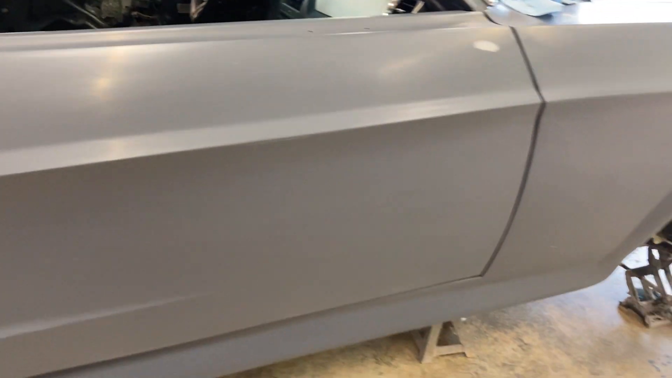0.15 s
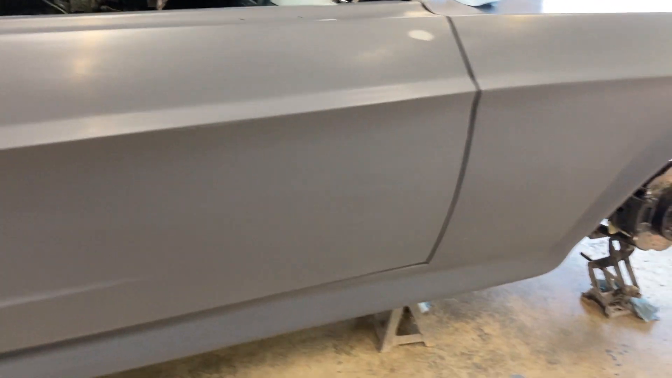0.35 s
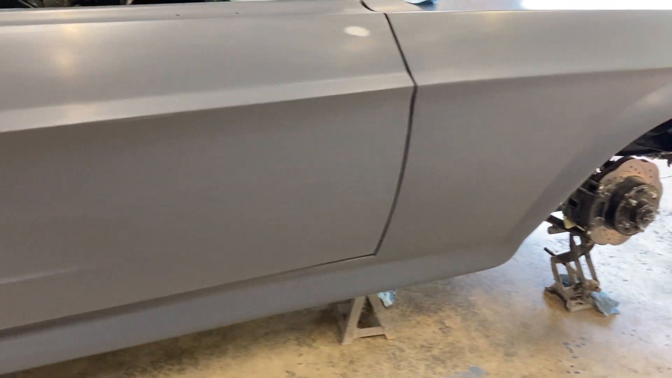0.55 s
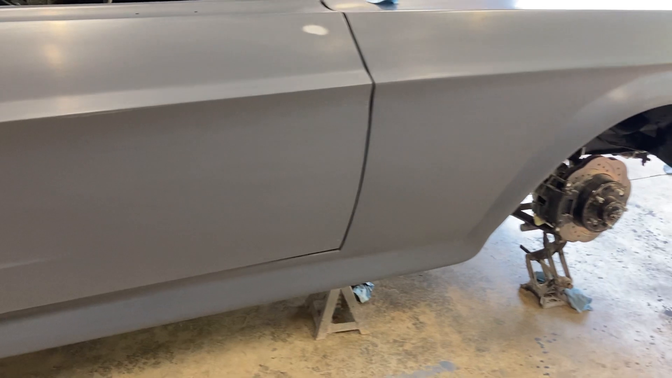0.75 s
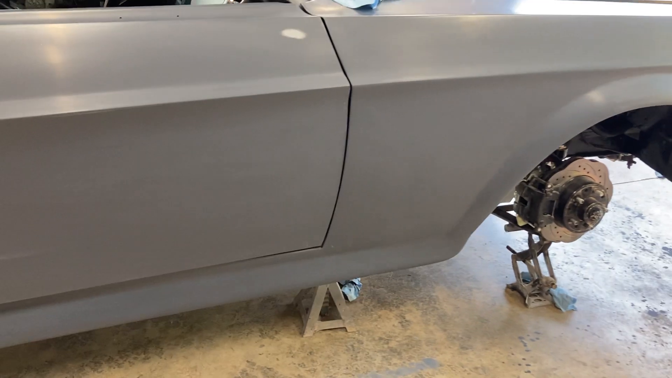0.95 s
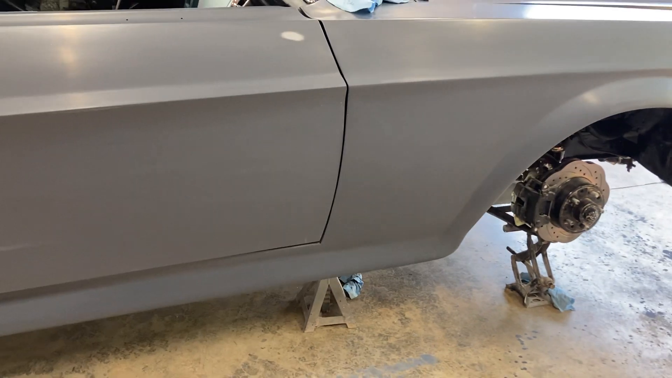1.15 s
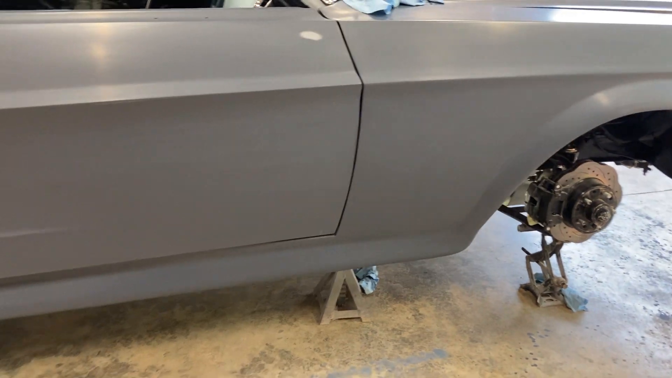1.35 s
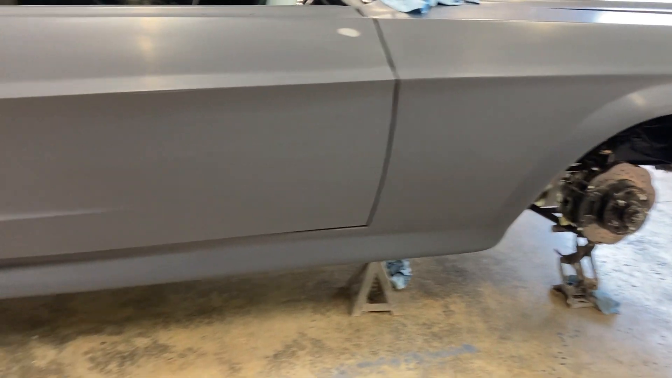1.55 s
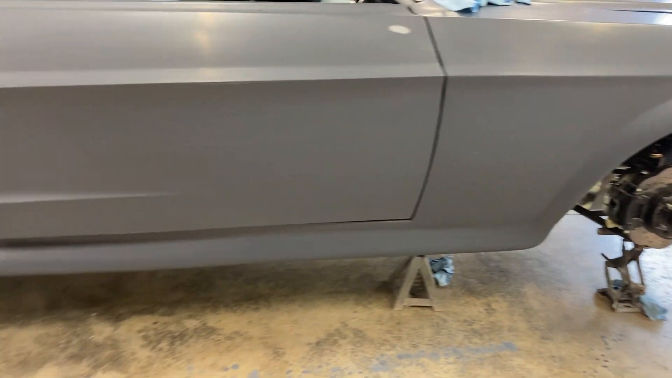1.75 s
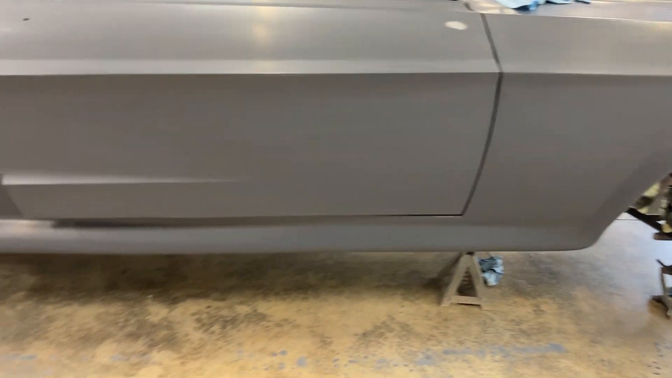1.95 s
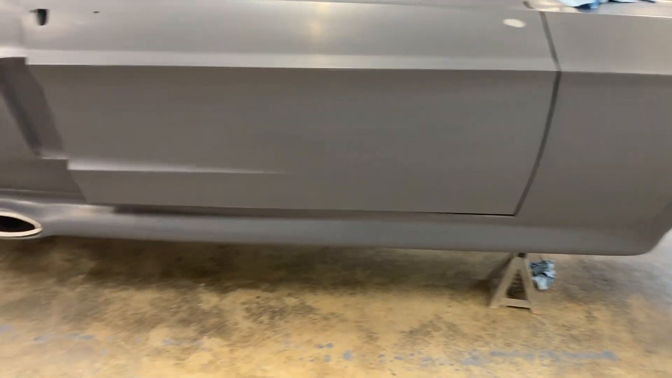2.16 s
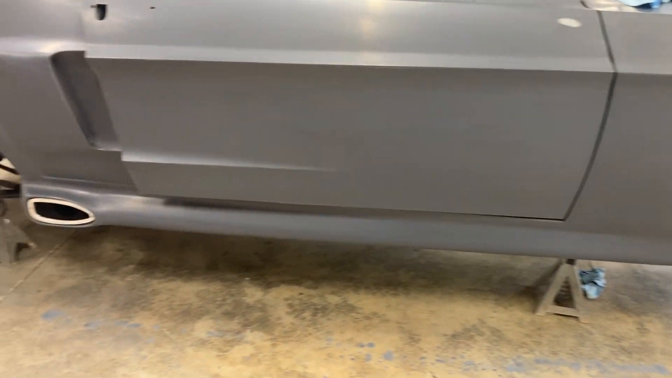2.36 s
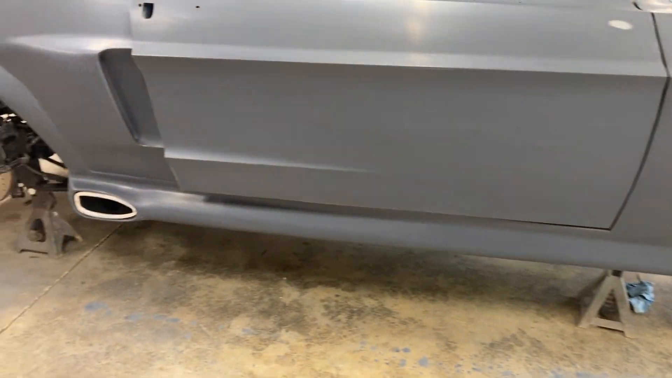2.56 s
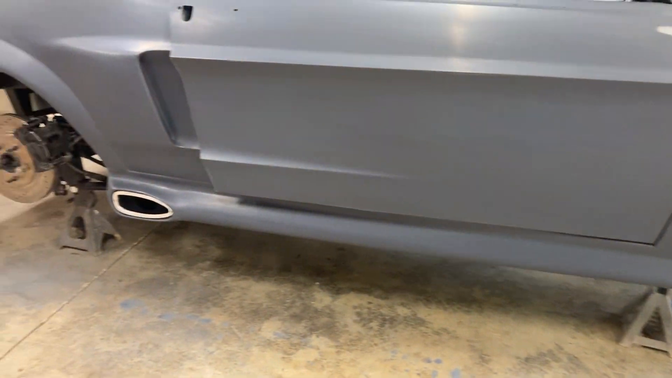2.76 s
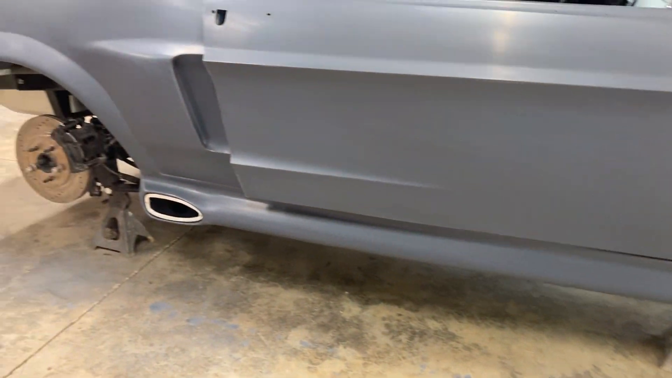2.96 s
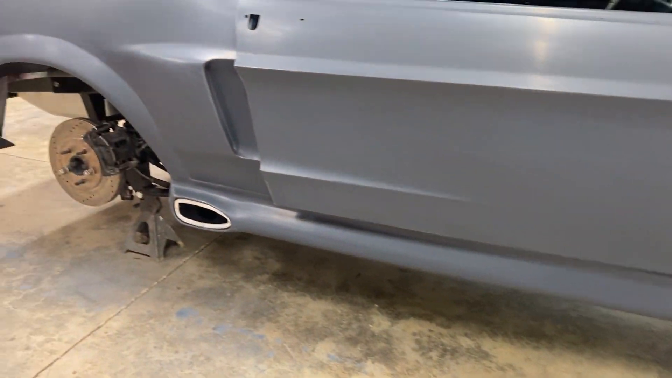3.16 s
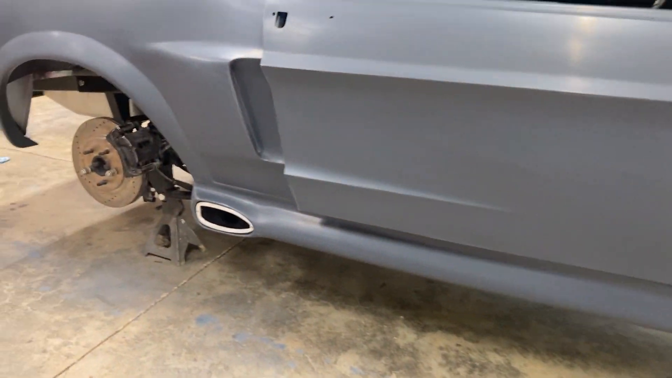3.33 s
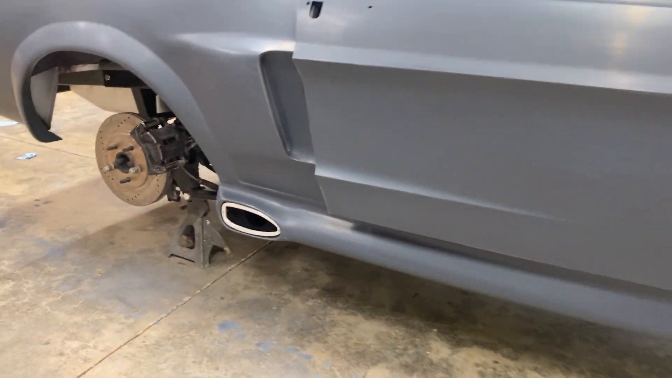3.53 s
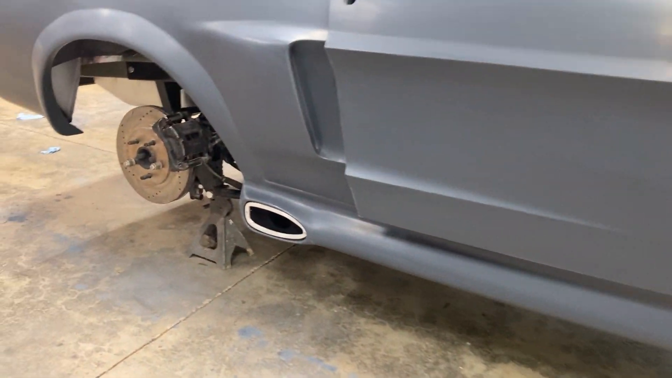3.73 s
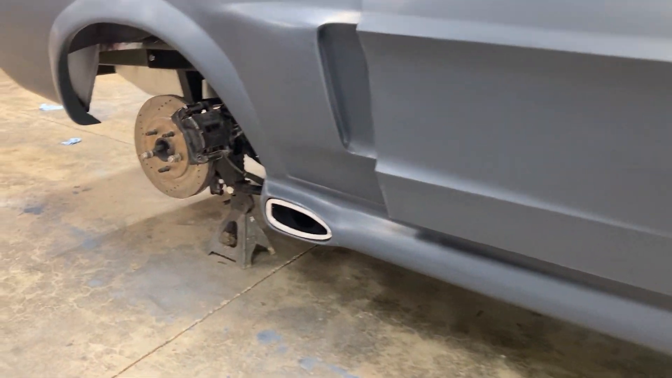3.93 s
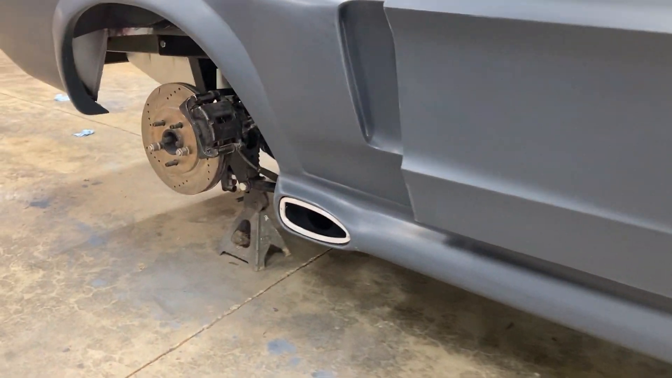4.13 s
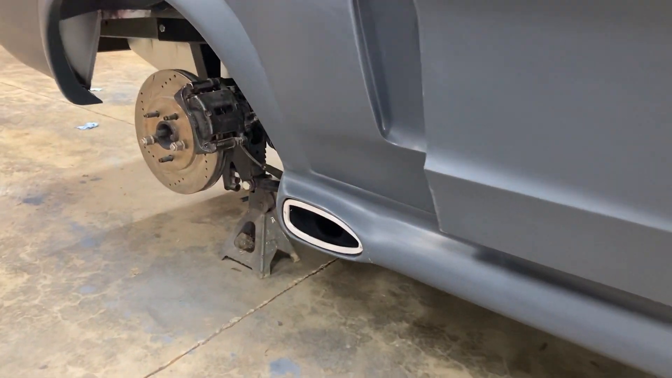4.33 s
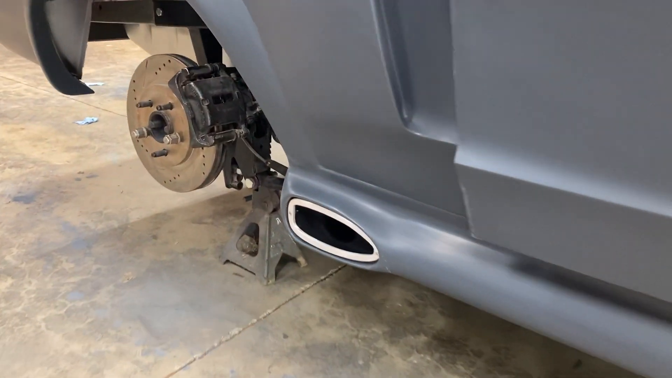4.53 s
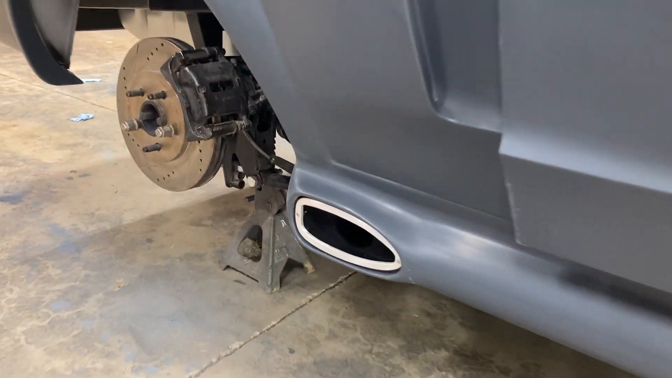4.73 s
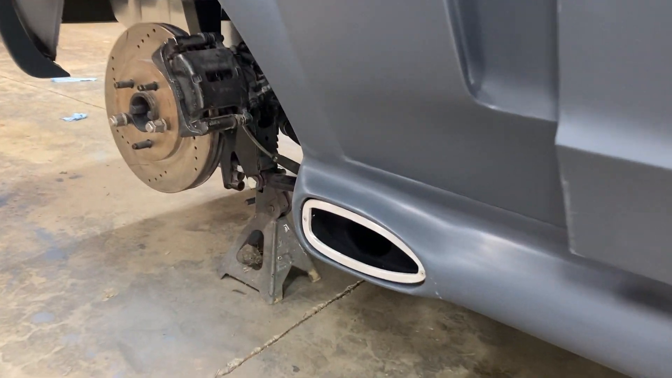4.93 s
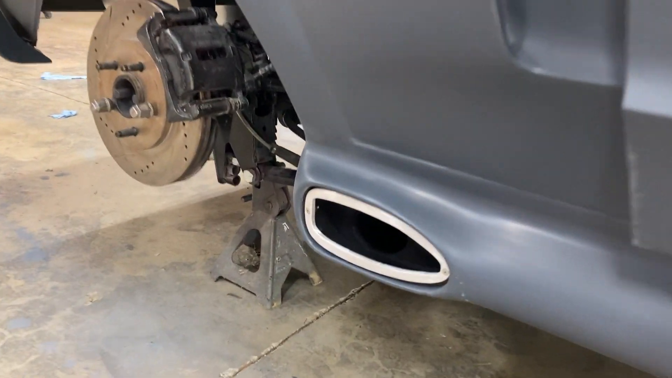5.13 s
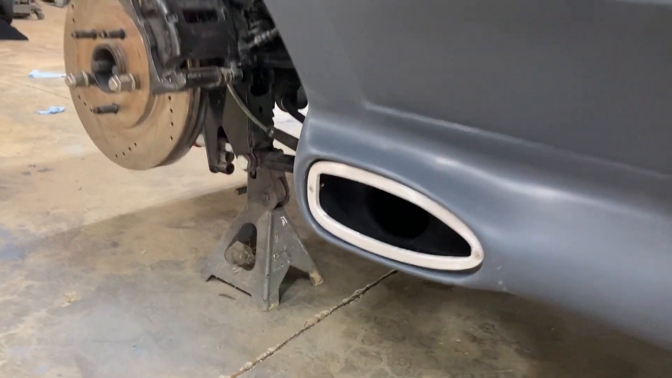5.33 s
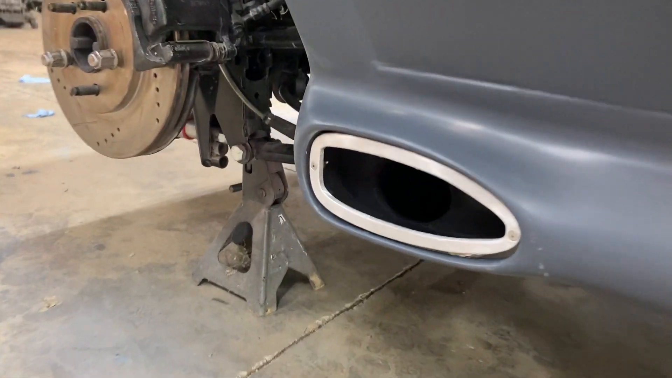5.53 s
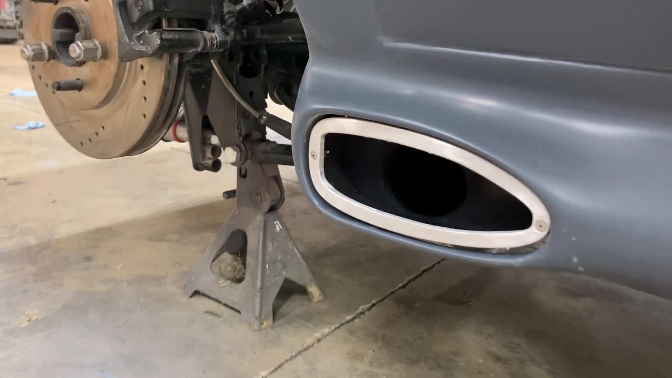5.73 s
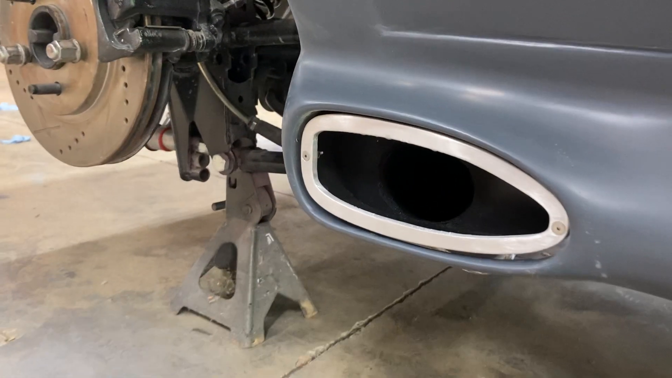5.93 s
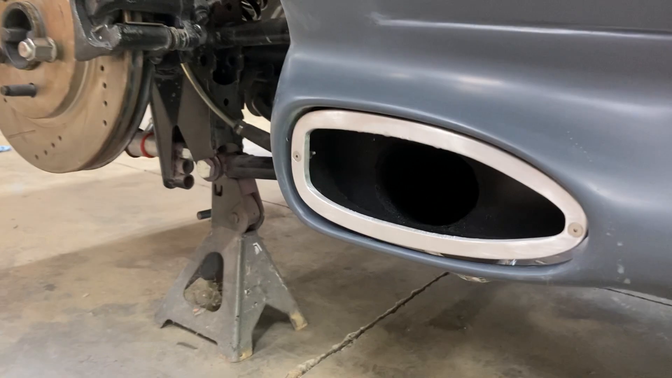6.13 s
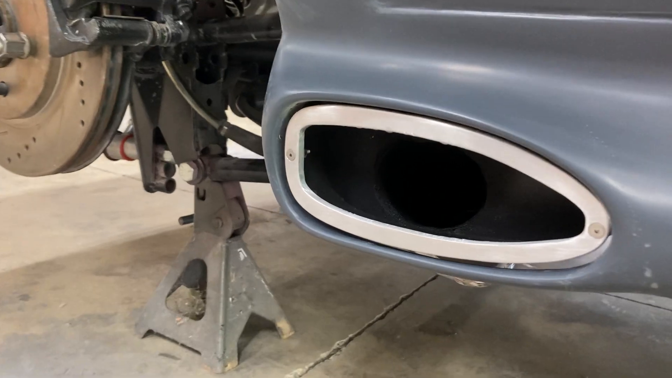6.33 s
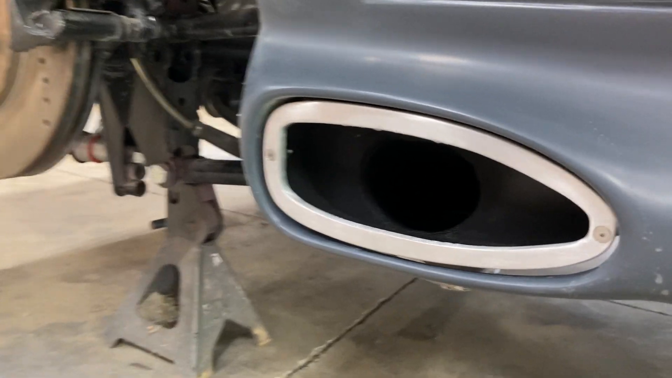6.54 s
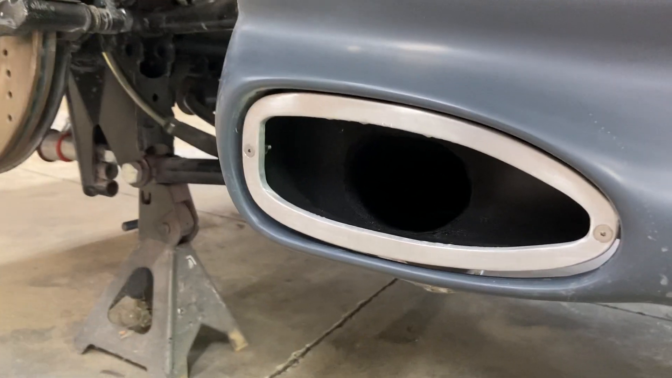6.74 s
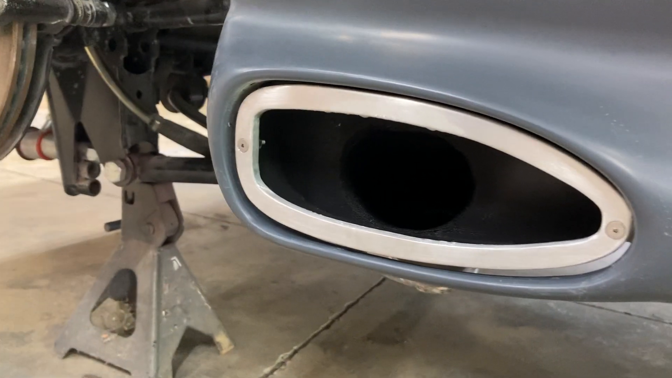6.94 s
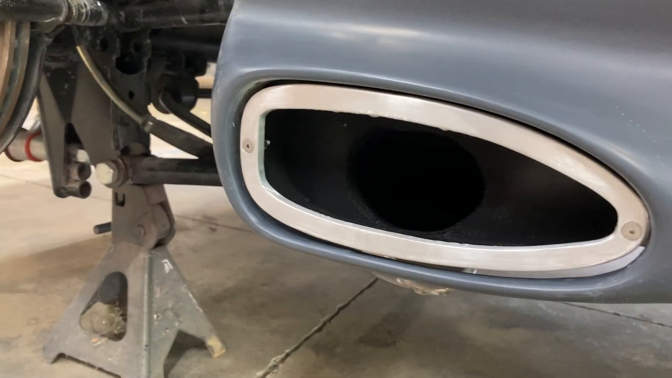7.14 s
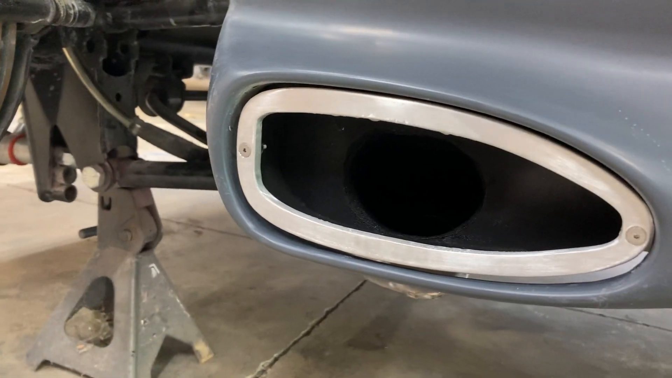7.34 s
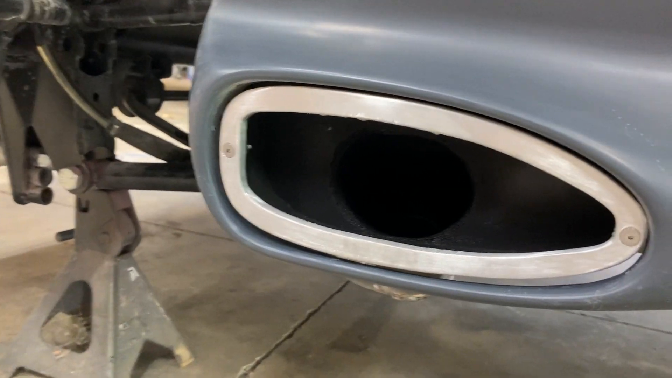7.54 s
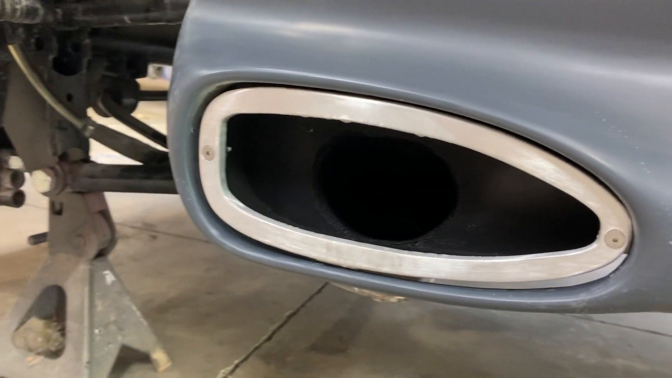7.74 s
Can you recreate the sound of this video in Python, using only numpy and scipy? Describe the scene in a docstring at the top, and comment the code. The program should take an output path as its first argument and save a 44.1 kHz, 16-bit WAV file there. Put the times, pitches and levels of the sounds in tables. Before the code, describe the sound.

A V8 idles with a lumpy low burble in a workshop, belt whine and valve clatter fading behind as the side exhaust grows louder and closer.

```python
"""A V8 idles in a workshop while a phone is walked from the front wing past the door to the side exhaust tip.
At the wing: belt whines, clatter, whirr and hiss of the bay, with two valve ticks a cycle in the hiss.
By the door the bay has moved to the right; towards the tip the exhaust grows louder.
Exhaust: uneven blows and echoes, nearly alike every cycle, ring pipe modes over firing tones and gas noise.
Bay: shaped noise, scattered tappet impulses and tones, tied to the same crank."""
import sys
import numpy as np
from scipy import signal
from scipy.fft import rfft, irfft, next_fast_len
from scipy.io import wavfile
from scipy.ndimage import uniform_filter1d, minimum_filter1d, map_coordinates

SR = 44100
rng = np.random.default_rng(int(sys.argv[2]) if len(sys.argv) > 2 else 0)


def waveform_to_disk(signal):
    """Save audio, clipped to [-1, 1], as 16-bit WAV at the path in sys.argv[1]."""
    frames = np.transpose(np.atleast_2d(signal))
    scaled = np.clip(frames, -1, 1) * 32767
    samples = np.round(scaled).astype(np.int16)
    wavfile.write(sys.argv[1], SR, samples)


N = 347508


def amp(db):
    """dB to gain."""
    return 10 ** (np.asarray(db) / 20)


def unit(x):
    """x at rms 1."""
    return x / np.sqrt(np.mean(x ** 2) + 1e-20)


def along(points, hz):
    """(f/Hz, value) points read on a log frequency axis."""
    f, value = np.transpose(points)
    return np.interp(np.log(hz + 1), np.log(f + 1), value)


def curves(rows):
    """One value per sample for each column after t/s."""
    t_s, *columns = np.transpose(rows)
    return [np.interp(np.arange(N) / SR, t_s, column) for column in columns]


def wobble(knots_per_s):
    """Smooth random curve through normal knots."""
    knots = rng.standard_normal(int(N * knots_per_s / SR) + 4)
    return map_coordinates(knots, [np.arange(N) * knots_per_s / SR])


def filtered(x, response):
    """x through a complex response of frequency."""
    m = next_fast_len(N + SR // 2)
    return irfft(rfft(x, m) * response(np.fft.rfftfreq(m, 1 / SR)), m)[..., :N]


def resonance(f, centre_hz, width_hz):
    """Causal band resonance of peak gain 1."""
    return 1j * f * width_hz / (centre_hz ** 2 - f * f + 1j * f * width_hz)


def ringing(modes, f):
    """Causal sum of (f/Hz, width/Hz, level/dB) resonances, each passed twice for dark valleys."""
    return sum(amp(db) * resonance(f, hz, width_hz) ** 2 for hz, width_hz, db in modes)


def spectrum(points):
    """Noise colour: gain response through (f/Hz, density/dB) points."""
    return lambda f: amp(along(points, f))


def alike(hz):
    """Left-right likeness by frequency: the channels differ more in the treble."""
    # f/Hz, correlation
    likeness = [(60, 0.83), (300, 0.98), (640, 0.78), (1400, 0.4), (3500, 0.28), (6000, 0.16)]
    return along(likeness, hz)


def noise(response, likeness, gate=1):
    """Stereo noise of rms 1, gated before its filter; mid and side shares set likeness(hz)."""
    turn = lambda hz: np.arccos(np.clip(likeness(hz), -1, 1)) / 2
    split = lambda hz: response(hz) * [np.cos(turn(hz)), np.sin(turn(hz))]
    mid, side = filtered(gate * rng.standard_normal((2, N)), split)
    return unit(np.array([mid + side, mid - side]))


def place():
    """Position along the car: 0 front wing, 1 door, 2 exhaust tip."""
    # t/s, place
    walk = [(0, 0), (2.2, .1), (3.2, 1.0), (4.6, 1.0), (5.7, 2.0), (7.88, 2.0)]
    return curves(walk)[0]


def by_place(values):
    """A (wing, door, tip) triple read along the walk."""
    return np.interp(place(), range(3), values)


def in_cycle(cycles, bumps):
    """dB lift of (centre/cycle, length/cycle, lift/dB) bumps that return every cycle."""
    offset = lambda at: (cycles - at + .5) % 1 - .5
    return sum(db * np.exp(-(offset(at) / span) ** 2) for at, span, db in bumps)


def exhaust(cycles):
    """Blows ring the pipe over firing tones; gas rush feeds the higher modes."""
    # t/s, bark level/dB, firing tone level/dB, octave level/dB, 2nd mode level/dB, 3rd mode level/dB
    # (all before trims)
    levels = [(0, -21.5, -32.5, -30, -39, -35.5), (.7, -23, -33, -29.5, -33, -31),
              (1.3, -21, -34, -31.5, -36, -31), (2.0, -20, -34.5, -34, -35, -30.5),
              (2.7, -22.5, -32.5, -35, -35, -38), (3.3, -22, -32, -38.5, -33, -34.5),
              (4.0, -21.5, -31, -33, -30.5, -36), (4.7, -19, -29.5, -32, -31.5, -32.5),
              (5.3, -19, -25.5, -28, -32, -27), (5.8, -16, -23, -31, -29, -30.5),
              (6.3, -16.5, -21.5, -29, -26, -31.5), (6.7, -13.5, -23.5, -20.5, -25, -25.5),
              (7.25, -14, -21, -22.5, -23.5, -27.5), (7.88, -13.5, -23, -17.5, -21.5, -24)]
    bark_db, firing_db, octave_db, second_db, third_db = curves(levels)
    trains = blow_trains(cycles)
    barking = bark(trains) + drone(cycles)
    mono = amp(bark_db - 1.2 + .4 * wobble(3)) * barking
    mono = mono + np.sqrt(2) * firing_tones(cycles, firing_db, octave_db) + buffet(firing_db)
    quadrature = filtered(mono, lambda f: .06j * np.ones_like(f))  # the left port leads slightly
    low = mono * amp([[.9], [-.9]]) + quadrature * [[1], [-1]]
    low = low + amp(second_db) * second_mode(cycles, trains)
    return low + overtones(cycles, trains, third_db) + rumble(cycles, bark_db)


def blow_trains(cycles):
    """One impulse train per spot on the walk: blows as both pipes and the walls deliver them."""
    # one list per spot: moment/cycle, size/dB before spread
    patterns = [
        [(0.079, -12.2), (0.109, -7.6), (0.139, -9.2), (0.306, -6.0), (0.479, 0.0), (0.564, -1.9),
         (0.613, -8.7), (0.718, -6.5), (0.87, -9.8), (0.937, -9.6), (0.985, -1.6)],
        [(0.109, -7.7), (0.171, -10.0), (0.239, -6.9), (0.302, -4.3), (0.477, -1.4), (0.49, -6.4),
         (0.559, -3.4), (0.609, -8.3), (0.755, -3.5), (0.867, -1.8), (0.983, 0.0)],
        [(0.116, -7.1), (0.178, -8.5), (0.206, -4.2), (0.275, -9.9), (0.444, 0.0), (0.522, -7.0), (0.713, -7.4),
         (0.828, -6.3), (0.898, -6.4), (0.914, -6.0), (0.947, -2.7)],
        [(0.029, -7.1), (0.086, -8.3), (0.152, -12.4), (0.281, -8.7), (0.308, -10.0), (0.448, 0.0),
         (0.675, -7.6), (0.87, -7.2), (0.922, -5.4), (0.943, -6.4), (0.955, -1.4)],
        [(0.031, -5.6), (0.088, -6.0), (0.115, -6.6), (0.244, -3.6), (0.27, -9.9), (0.449, 0.0), (0.697, -7.8),
         (0.718, -4.4), (0.869, -1.1), (0.881, -9.7), (0.958, -3.0)],
    ]
    return np.array([blows(cycles, pattern) for pattern in patterns])


def blows(cycles, pattern):
    """One impulse per blow; combustion makes each a little different."""
    scatter_db, drift_db, jitter_s = 1.0, 1.0, .00015
    share, size_db = np.transpose(pattern)
    moment = np.arange(-1, int(cycles[-1]) + 1)[:, None] + share
    jitter, scatter, drift = rng.standard_normal((3,) + moment.shape)
    size_db = size_db + drift_db * unit(uniform_filter1d(drift, size=5, axis=0))
    size_db = size_db + scatter_db * scatter
    at = np.interp(moment, cycles, np.arange(N), left=-N, right=-N) + jitter_s * SR * jitter
    inside = (at >= 0) & (at < N - 1)
    return np.bincount(at[inside].astype(int), amp(size_db)[inside], N)


def struck(trains, response):
    """Blows ringing a response, crossfaded from spot to spot; rms 1."""
    # t/s at which the phone passes each spot
    spots_s = (.84, 2.5, 4.25, 5.55, 6.94)
    spot = np.interp(np.arange(N) / SR, spots_s, range(len(spots_s)))
    share = np.clip(1 - abs(spot - np.arange(len(spots_s))[:, None]), 0, 1)
    rings = filtered(trains, response)
    return unit(sum(part * unit(ring) for part, ring in zip(share, rings)))


def bark(trains):
    """First pipe resonance and weaker ones above it, notched by the silencer, struck by rounded blows."""
    # f/Hz, width/Hz, level/dB, polarity
    shoulders = [(177.7, 30, -9, 1), (205, 25, -9, -1)]

    def pipe(f):
        ring = resonance(f, 156.5, 46) ** 2
        ring = ring + sum(sign * amp(db) * resonance(f, hz, w) for hz, w, db, sign in shoulders)
        silencer = 1 - resonance(f, 237.6, 57)
        return ring * silencer * np.exp(-(f / 480) ** 2)

    return struck(trains, pipe)


def drone(cycles):
    """The third firing harmonic and a side order near the pipe's resonance hum on between the blows."""
    # one row per order: level/dB re bark at the wing, door, tip
    drone_db = [(-12, -11, -10), (-10, -13, -30)]
    # one row per order: lead/rad at the wing, door, tip
    drone_lead_rad = [(2.5, 1.5, .7), (1.4, 1.5, .6)]
    turn = 2 * np.pi * cycles
    return sum(np.sqrt(2) * amp(by_place(db)) * np.cos(order * turn + by_place(lead_rad))
               for order, db, lead_rad in zip((24, 26), drone_db, drone_lead_rad))


def firing_tones(cycles, firing_db, octave_db):
    """Eight firings a cycle, their octave, and side orders: the uneven banks make the idle lope."""
    # order/cycle, lead/rad
    side_orders = [(5, -2.9), (6, -1.2), (7, 2.9), (10, 1.0), (11, -2.7), (46, -1.2)]
    # one row per side order: level/dB re firing tone at the wing, door, tip, before wander
    side_db = [(-28, -24, -22), (-19, -18, -17), (-6, -6, -11), (-25, -25, -19), (-15, -14, -16),
               (-10.5, -17, -25)]
    wander_db = (1.2, 1.5, 2.5)  # wing, door, tip
    turn = 2 * np.pi * cycles
    tones = np.cos(8 * turn)
    for (order, lead_rad), db in zip(side_orders, side_db):
        level_db = by_place(db) + by_place(wander_db) * wobble(2.63)
        tones = tones + amp(level_db) * np.cos(order * turn + lead_rad)
    octave = np.cos(16 * turn + by_place((3.2, 3.2, 1.0)))  # lead/rad
    tones = amp(firing_db) * tones + amp(octave_db) * octave
    return tones * amp(.6 * wobble(5))  # no two cycles burn alike


def buffet(firing_db):
    """Gas jet shaking the air: low noise whose level wanders under the firing tone."""
    # f/Hz, density/dB
    jet_points = [(18, -30), (28, -8), (42, 0), (62, -5), (90, -10), (130, -40), (200, -120)]
    level_db = firing_db + by_place((-16, -17, -11)) + 3 * wobble(3)
    return amp(level_db) * unit(filtered(rng.standard_normal(N), spectrum(jet_points)))


def tilted(modes):
    """Ringing modes weighted by a broad resonance above the first of them."""
    first_hz = modes[0][0]
    return lambda f: ringing(modes, f) * resonance(f, 1.72 * first_hz, 2.0 * first_hz)


def second_mode(cycles, trains):
    """Second pipe mode, rung by the blows and fed by puffs of gas noise."""
    # f/Hz, width/Hz per pass, level/dB before tilt: shoulder, then mode
    second_modes = [(283, 125, 3.5), (329.2, 41.7, 11.5)]
    # centre/cycle, length/cycle, lift/dB before depth
    puffs = [(.09, .035, 4), (.25, .09, -4), (.42, .05, 6), (.78, .045, 5), (.96, .04, -3)]
    late_s = .00156

    def rung(f):
        return resonance(f, 325, 39) ** 2 * np.exp(-2j * np.pi * f * late_s - (f / 1400) ** 2)

    gate = amp(by_place((.3, .3, 1.3)) * in_cycle(cycles, puffs))
    return amp(-9.5) * struck(trains, rung) + amp(-4.0) * noise(tilted(second_modes), alike, gate)


def overtones(cycles, trains, third_db):
    """Gas flow swelling and lulling within a cycle rings the higher modes; blows also strike the third."""
    # f/Hz, width/Hz per pass, level/dB before tilt
    modes = [(437.3, 59, -10), (488.8, 34.6, 2), (645.2, 42, -4.5), (691, 17, -6.5), (828, 132, -11),
             (970.4, 53, -12.5), (1112, 33, -15)]
    # centre/cycle, length/cycle, lift/dB before depth
    flow_bumps = [(.25, .08, 3.5), (.46, .03, 2.5), (.7, .07, -4.5), (.97, .05, 3.5)]
    # t/s, 4th mode level/dB, higher modes level/dB
    upper_levels = [(0, -39, -47.5), (.8, -45, -47.5), (1.6, -39.5, -48), (2.4, -47.5, -47),
                    (3.2, -46.5, -47), (4.0, -45.5, -45), (4.8, -41.5, -44.5), (5.3, -38, -45),
                    (5.8, -35.5, -42), (6.3, -35, -42), (6.8, -35.5, -40), (7.3, -33, -40),
                    (7.88, -31.5, -37.5)]
    flow = amp(by_place((.4, .5, 1.1)) * in_cycle(cycles, flow_bumps))
    third_pipe = tilted(modes[:2])
    third = amp(-11.5) * struck(trains, third_pipe) + noise(third_pipe, alike, flow)
    fourth_db, higher_db = curves(upper_levels)
    fourth = amp(fourth_db) * noise(tilted(modes[2:4]), alike, flow)
    higher = amp(higher_db) * noise(tilted(modes[4:]), alike, flow)
    return amp(third_db - 5.5) * third + fourth + higher


def rumble(cycles, bark_db):
    """Turbulent gas under the bark, filling the weak half of the cycle."""
    # f/Hz, density/dB
    rumble_points = [(25, -33), (42, -32), (75, -19), (120, 1.5), (145, -13), (165, -4.5), (205, -1),
                     (235, -10.5), (270, -11.5), (420, -26), (900, -35), (1500, -88)]
    swell = amp(in_cycle(cycles, [(.28, .14, 4)]))
    return amp(bark_db + by_place((-11, -10, -8.5))) * noise(spectrum(rumble_points), alike, swell)


def engine_bay(cycles):
    """Clatter, whirr, tappets, whines and hiss; from the side, sound reaches the right port first."""
    # f/Hz, density/dB
    clatter_points = [(600, -0.5), (850, -3), (1300, -2.5), (1600, -6.5), (1800, -6), (2150, -8.5),
                      (2400, -8.5), (2650, -13), (3000, -65)]
    # f/Hz, density/dB
    whirr_points = [(2200, -17.5), (2900, -2.5), (3400, -6.5), (4200, -9.5), (5500, -15.5), (6200, -24),
                    (7000, -68)]
    clatter = bay_noise(cycles, clatter_points, (-40.5, -39.5, -38), .4)
    whirr = bay_noise(cycles, whirr_points, (-50, -50, -48), .8)
    taps = tappets()
    aside = bay_aside()
    taps = (1 - aside) * taps + aside * filtered(taps, left_late)
    taps = amp(by_place((-51.5, -52.5, -53))) * taps
    return clatter + whirr + taps + whines(cycles) + hiss(cycles)


def bay_aside():
    """0 with the bay ahead, 1 with it at the right from the door on."""
    return np.clip(place(), 0, 1)


def left_late(f):
    """Port spacing: the left lags the right by 10 samples."""
    return np.exp(1j * np.pi * f * 10 / SR * np.array([[-1], [1]]))


def bay_noise(cycles, points, level_db, pan_db):
    """Uneven noise turning from ahead to beside; near the bay it thickens once a cycle with the rockers."""
    aside = bay_aside()
    ahead, beside = (uneven(noise(spectrum(points), alike), 2.6) for _ in range(2))
    mix = np.sqrt(1 - aside) * ahead + np.sqrt(aside) * filtered(beside, left_late)
    rockers_db = (1 - aside) * in_cycle(cycles, [(.36, .1, 2.5)])
    flicker_db = .34 * wobble(10.0) + .8 * wobble(60)
    return amp(by_place(level_db) + flicker_db + rockers_db + [[pan_db], [-pan_db]]) * mix


def uneven(x, depth_db):
    """Noise at rms 1, uneven in time and frequency."""
    z = signal.stft(x, nperseg=2048)[2]
    field = uniform_filter1d(rng.standard_normal(z.shape[1:]), size=4, axis=0)
    field = uniform_filter1d(field, size=7, axis=1)
    return unit(signal.istft(z * amp(depth_db * unit(field)), nperseg=2048)[1][:, :N])


def tappets():
    """Scattered small ticks ringing the valve gear, each from its own side; rms 1."""
    # f/Hz, width/Hz per pass, level/dB
    gear_modes = [(1380, 380, 4.5), (1765, 340, 4), (2050, 200, 2.5), (2360, 310, 1.5), (3270, 650, -6.5),
                  (4470, 950, -10.5)]
    taps_per_s, spread_db = 150, 17
    at, size, pan = rng.random((int(taps_per_s * N / SR), 3)).T
    at, size = (at * (N - 1)).astype(int), amp(spread_db * size ** 2)
    left = np.bincount(at, size * np.cos(pan * np.pi / 2), N)
    right = np.bincount(at, size * np.sin(pan * np.pi / 2), N)
    return unit(filtered(np.array([left, right]), lambda f: ringing(gear_modes, f)))


def whines(cycles):
    """Belt, pulley and alternator tones that follow the idle speed; belt tones are breathy by their width."""
    # order/cycle, width/Hz, level/dB before pan, from t/s, to t/s
    belt_tones = [(266, 22, -59, 0, 3.8), (266, 22, -63, 3.8, 7.88), (212, 26, -57, 0, 2.8),
                  (368, 45, -60, 0, 2.7), (502, 30, -65, 1.8, 7.3), (503, 20, -59, 7.4, 7.88)]
    # t/s, level/dB before wobble and pan
    whistle_levels = [(0, -68), (.5, -64), (1.9, -68), (2.5, -64), (3.4, -65), (3.65, -62), (3.75, -57),
                      (3.9, -57), (4.0, -62), (4.15, -62), (4.9, -71), (5.3, -63), (5.9, -62), (6.18, -58),
                      (6.26, -63), (6.35, -59), (6.55, -66), (6.7, -61), (7.1, -66), (7.88, -64)]
    t = np.arange(N) / SR
    turn = 2 * np.pi * cycles

    def fade(start_s, end_s):
        edge_s = np.minimum(t - start_s, end_s - t)
        return np.clip(edge_s * 5 + .5 + (start_s == 0), 0, 1)

    def breathy(order, width_hz):
        return unit(wobble(width_hz) * np.cos(order * turn) + wobble(width_hz) * np.sin(order * turn))

    belts = sum(amp(db) * fade(*span) * np.array([breathy(order, w), breathy(order, w)])
                for order, w, db, *span in belt_tones)
    whistle_db = curves(whistle_levels)[0] + 1.5 * wobble(15)
    whistle = np.sqrt(2) * amp(whistle_db) * np.cos(577 * turn + .8 * wobble(25))  # alternator order
    return amp([[1.5], [-1.5]]) * (belts + whistle)


def hiss(cycles):
    """Intake hiss whose level flickers, with valve ticks in the valve cover's band."""
    # f/Hz, density/dB
    hiss_points = [(4500, -12.5), (6300, -9), (7600, -4), (9000, -8.5), (12000, -6), (15700, -10)]
    # centre/cycle, length/cycle, lift/dB
    ticks = [(.51, .04, 7), (.11, .025, 2.5)]
    air = noise(spectrum(hiss_points), lambda hz: .92 + 0 * hz)
    cover = filtered(air, lambda f: resonance(f, 7900, 1900))
    air = air + (amp(in_cycle(cycles, ticks)) - 1) * cover
    air = amp(.3 * wobble(8) + .6 * wobble(50)) * air
    # port spacing: in step at 6900 Hz and every 4350 Hz from it
    ports = lambda f: np.exp(1j * np.pi * (f - 6900) / 4350 * np.array([[-1], [1]]))
    return amp(by_place((-48, -47, -46.5))) * filtered(air, ports)


def scene():
    """One crank, its idle speed hunting, drives everything; a four-stroke cycle takes two turns."""
    # t/s, crank speed/rpm
    idle_speed = [(0.0, 774.1), (0.38, 788.2), (0.75, 784.3), (1.13, 790.6), (1.5, 797.0), (1.88, 802.9),
                  (2.25, 785.6), (2.63, 790.2), (3.0, 783.2), (3.38, 785.2), (3.75, 787.2), (4.13, 792.8),
                  (4.5, 787.2), (4.88, 777.9), (5.25, 789.2), (5.63, 783.4), (6.0, 768.1), (6.38, 775.9),
                  (6.75, 791.7), (7.13, 773.9), (7.5, 792.2), (7.88, 790.6)]
    start_cycle = .0201
    cycles = start_cycle + np.cumsum(curves(idle_speed)[0]) / 120 / SR
    return exhaust(cycles) + engine_bay(cycles)


def record(dry):
    """The phone's limiter leans on the loudest blows; nothing is kept above its band limit."""
    ceiling, top_hz = .9, 15730
    needed = np.minimum(1, ceiling / (np.abs(dry).max(axis=0) + 1e-9))
    gain = uniform_filter1d(minimum_filter1d(needed, size=SR // 50), size=SR // 100)
    return filtered(dry * gain, lambda hz: hz < top_hz)


dry = scene()
out = record(dry)
waveform_to_disk(out)
```